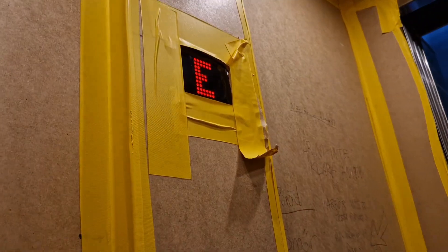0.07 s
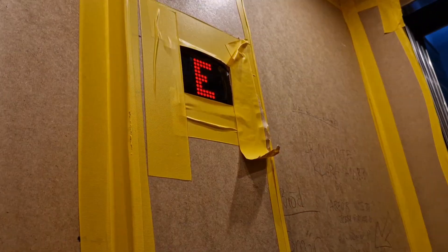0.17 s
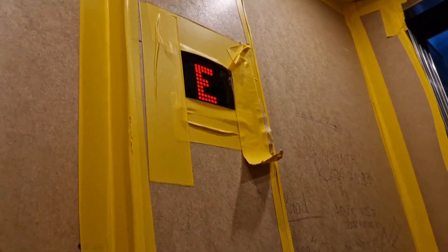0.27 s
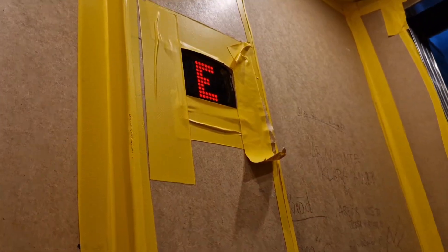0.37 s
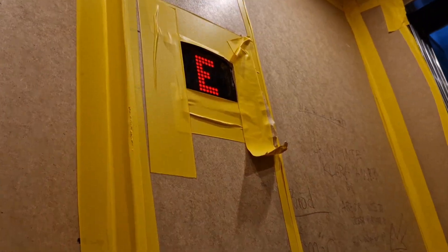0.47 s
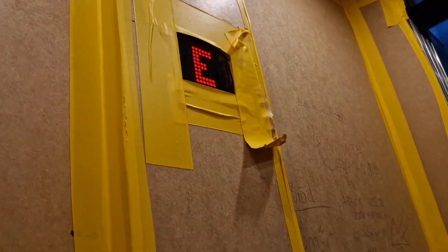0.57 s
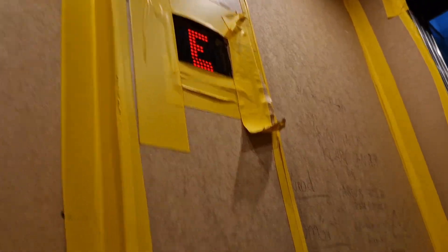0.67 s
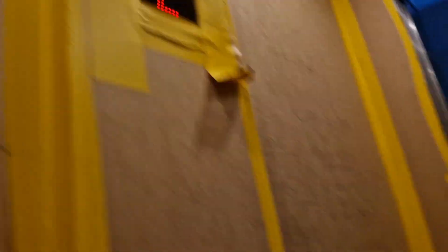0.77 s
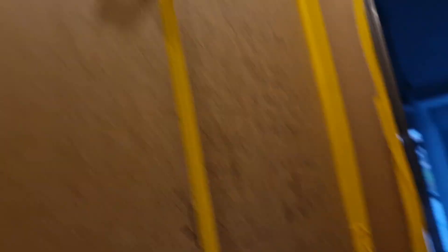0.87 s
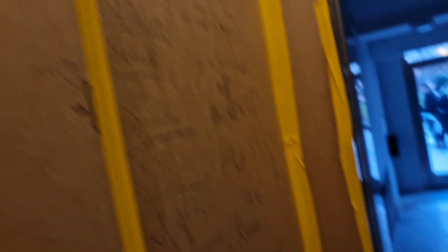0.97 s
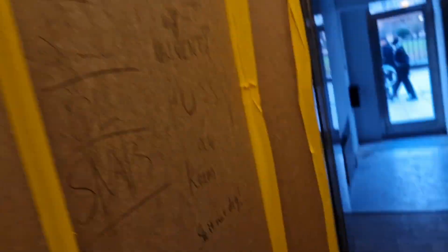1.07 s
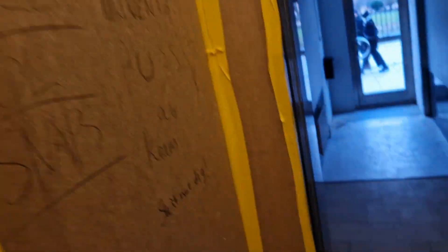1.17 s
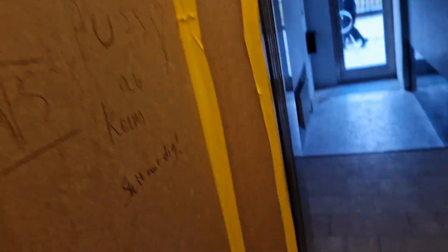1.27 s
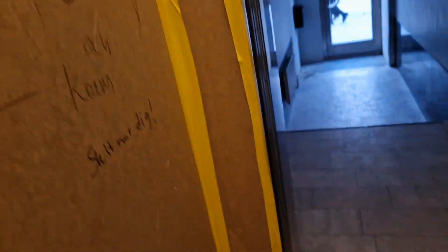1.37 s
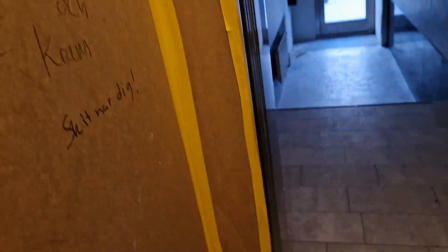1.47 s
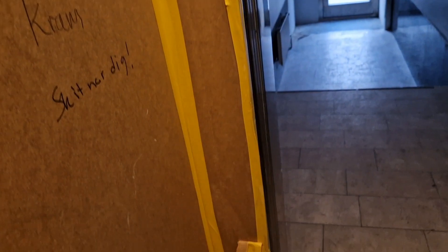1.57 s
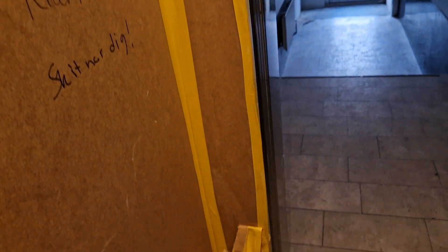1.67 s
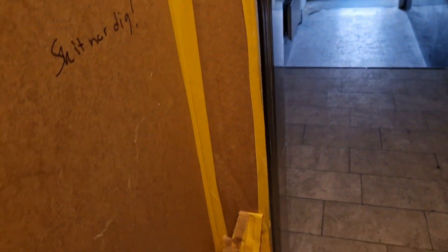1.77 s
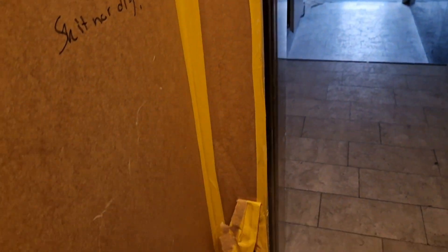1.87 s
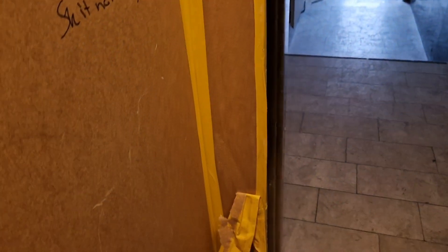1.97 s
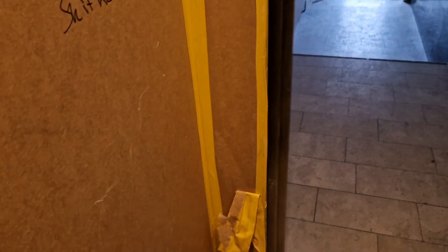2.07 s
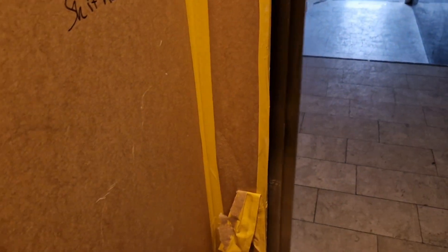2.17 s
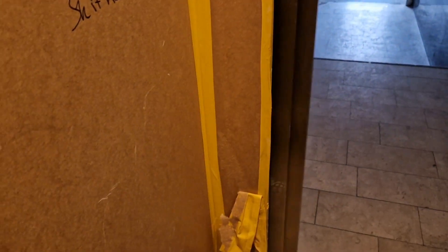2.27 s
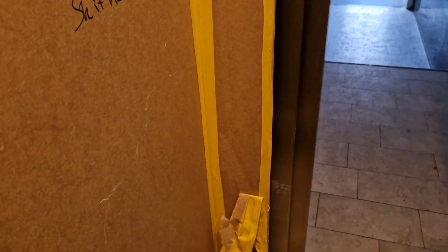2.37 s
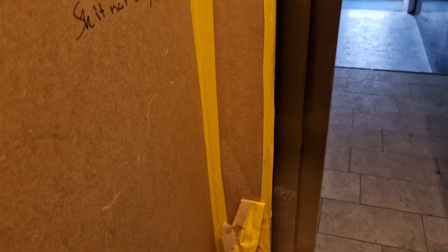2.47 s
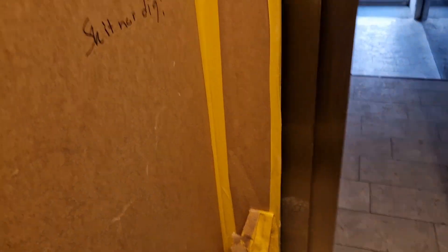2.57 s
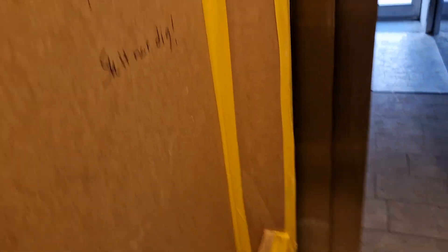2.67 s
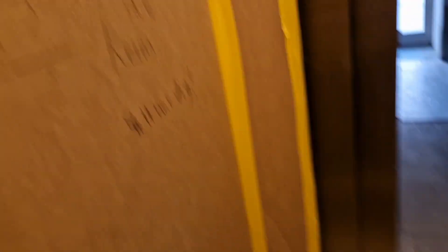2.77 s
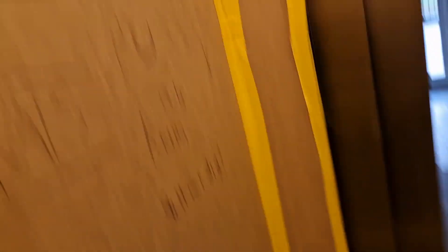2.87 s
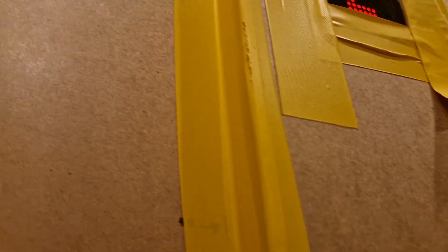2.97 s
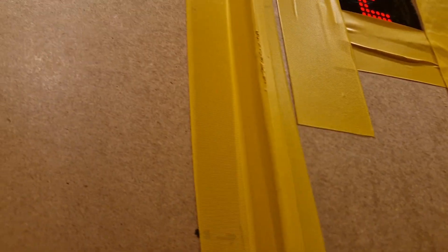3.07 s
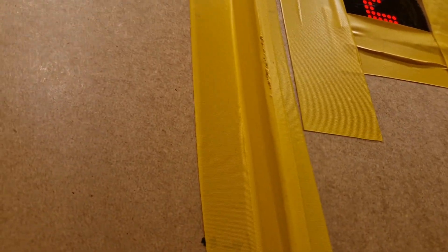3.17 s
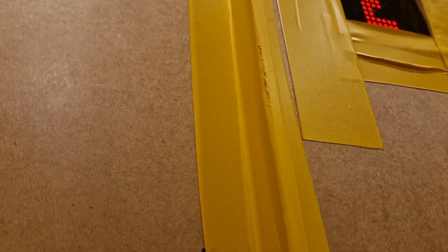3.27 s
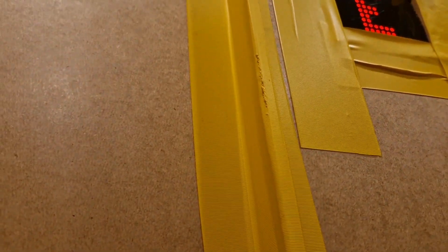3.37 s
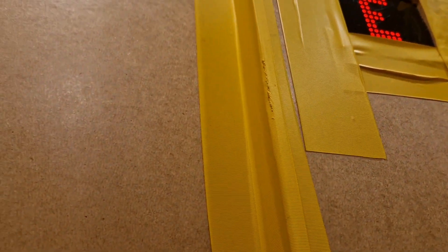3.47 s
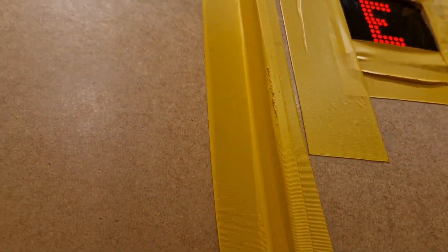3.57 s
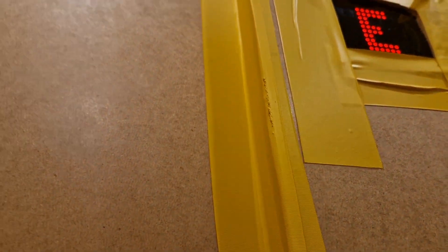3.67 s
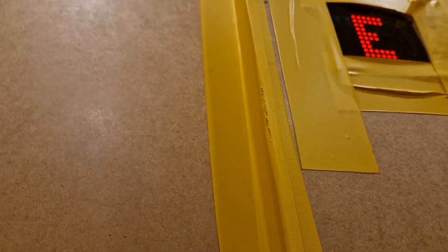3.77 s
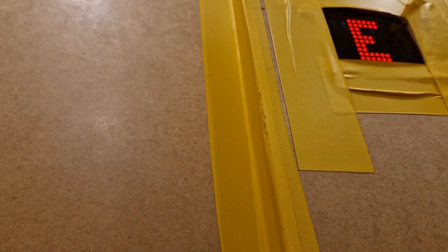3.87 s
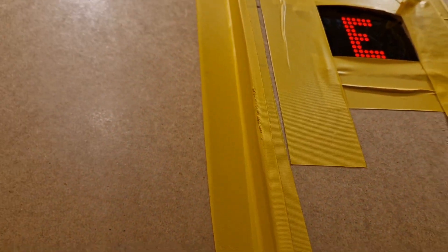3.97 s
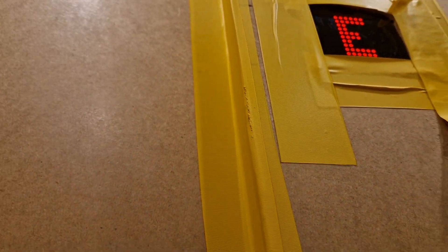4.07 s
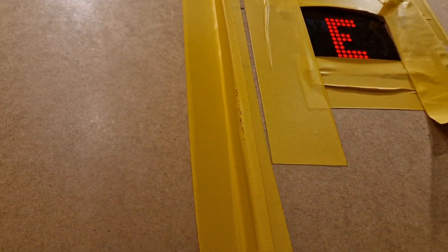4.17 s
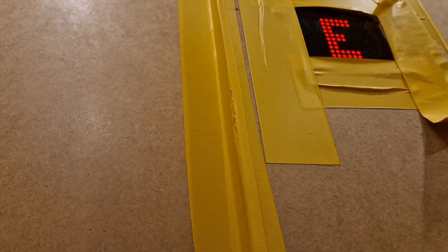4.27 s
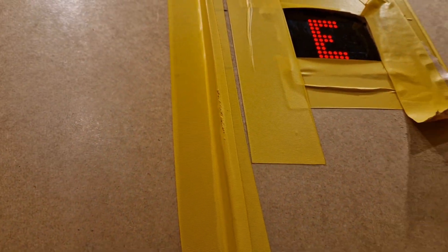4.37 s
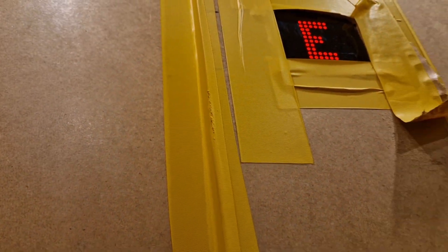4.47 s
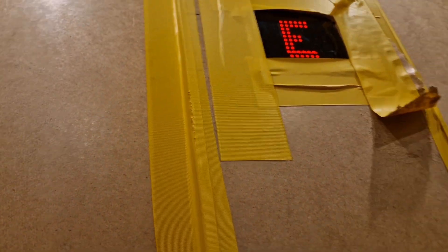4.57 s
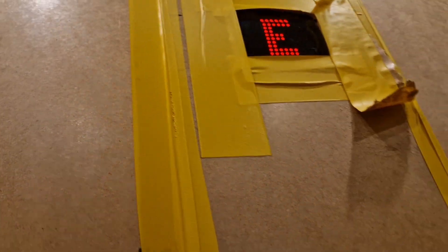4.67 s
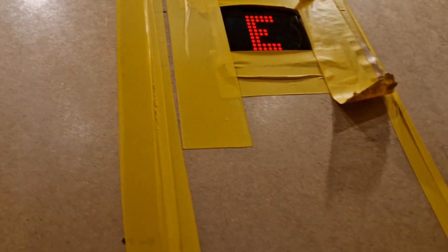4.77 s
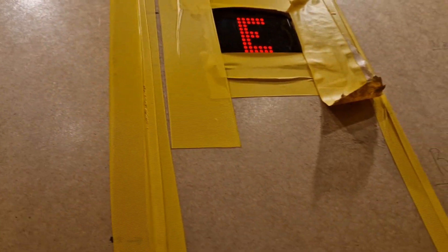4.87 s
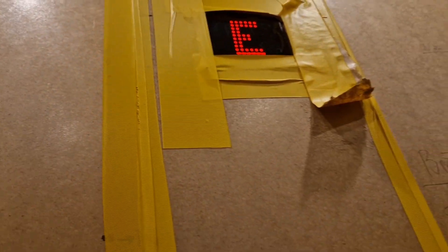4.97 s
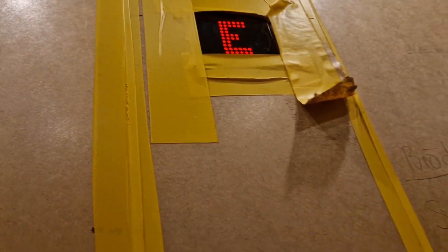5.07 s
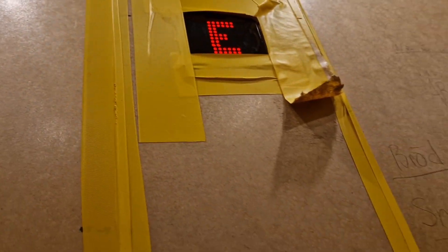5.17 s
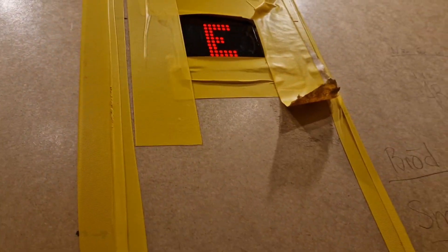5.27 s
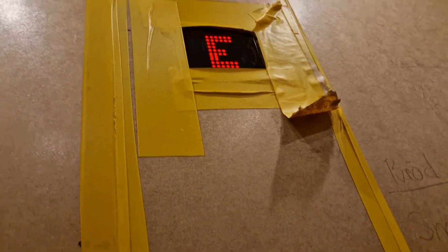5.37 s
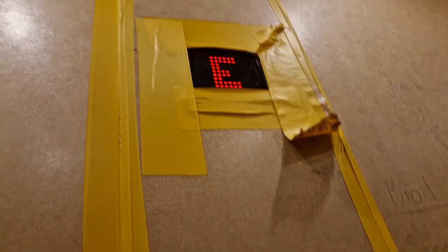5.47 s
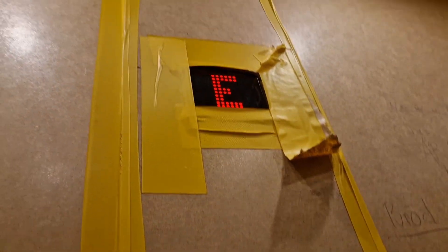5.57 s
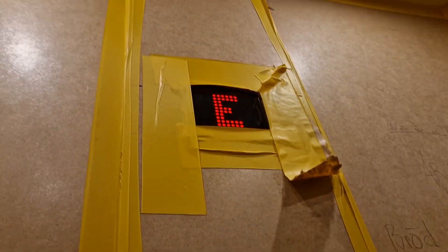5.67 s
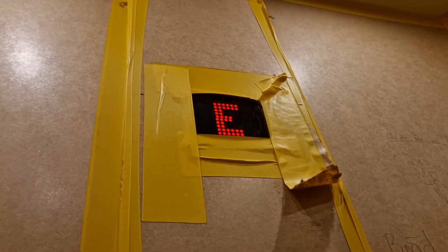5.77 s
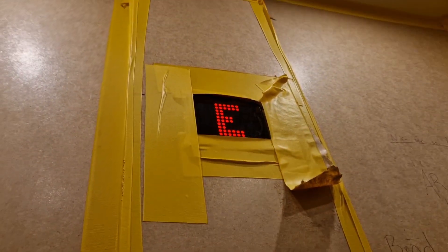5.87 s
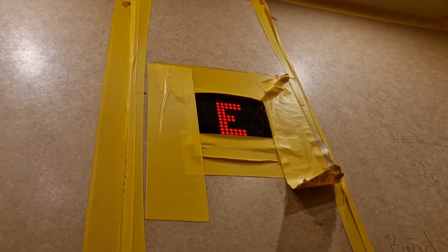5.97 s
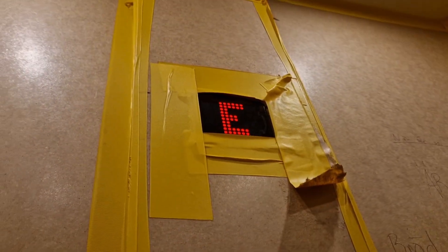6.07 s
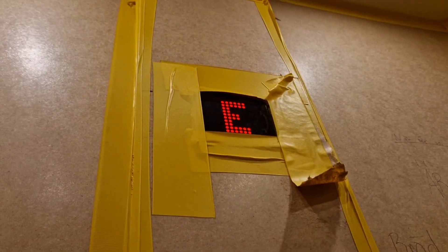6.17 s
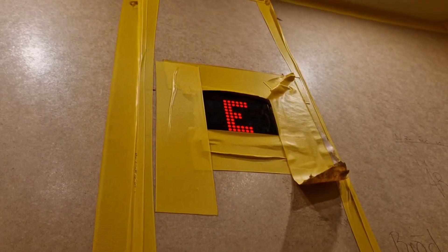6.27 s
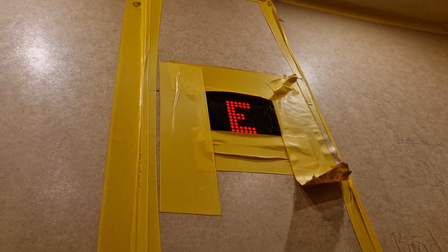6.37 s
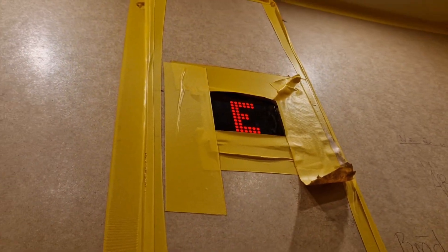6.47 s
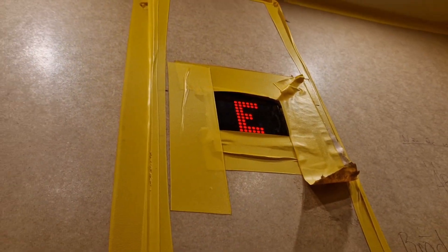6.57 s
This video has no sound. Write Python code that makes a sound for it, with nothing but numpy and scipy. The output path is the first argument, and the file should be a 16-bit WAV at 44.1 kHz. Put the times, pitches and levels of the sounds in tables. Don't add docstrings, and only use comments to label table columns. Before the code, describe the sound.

Lift doors roll shut with a deep boom and crisp uneven ticks, knock and scrape into place, then settle quietly amid close cloth rustle.

```python
import sys
import numpy as np
from scipy import signal
from scipy.fft import rfft, irfft, next_fast_len
from scipy.io import wavfile
from scipy.ndimage import uniform_filter1d

SR = 44100
rng = np.random.default_rng(int(sys.argv[2]) if len(sys.argv) > 2 else 0)


def boost_factor(decibels):
    exponent = np.asarray(decibels, float) / 20
    return 10 ** exponent


def log_audio(samples):
    frames = np.atleast_2d(samples).T
    limited = np.clip(frames, -1, 1)
    pcm = np.round(limited * 32767).astype(np.int16)
    wavfile.write(sys.argv[1], SR, pcm)


N = 292373
T = np.arange(N) / SR

# centre in Hz, width in Hz, level in dB.
CAR_PEAKS = [(30.2, 9.6, -1), (41.65, 11, 2.5), (52.3, 8.6, -2.5)]
LEAF_PEAKS = [(82.3, 15, 1), (110, 14.5, -4)]
SHEET_PEAKS = [(160.7, 50, 4), (242.4, 67, -4.5)]
FRAME_PEAKS = [(298.7, 48, 2), (366, 86, -2), (479, 120, -3), (567, 290, -6.5)]
# time in seconds, load on the car in dB, looseness of the leaves in dB.
DRIVE = [(0, -45.5, 1.5), (.47, -46, -4.5), (.83, -47, 3), (1.2, -44, 5), (1.68, -50.5, 2.5),
         (1.8, -31, -2.5), (2.3, -34, 4), (2.55, -33, 2.5), (3.1, -30, -2), (3.36, -29.5, -9),
         (3.52, -48, -1), (3.6, -33.5, -7.5), (4.05, -37, 3.5), (4.3, -29, 6), (4.67, -28, -1.5),
         (4.74, -36.5, -1), (5.45, -42.5, -1.5), (6.63, -55, -1)]
# level at idle in dB, share of load, share of looseness.
LEAF_FOLLOW = (-55, .9, 0.71)
SHEET_FOLLOW = (-61, .7, 1.)
FRAME_FOLLOW = (-60, 0.38, 1)
# start in seconds, hold in seconds, car in dB, leaf above car in dB, sheet above car in dB.
JOLTS = [(0.1, 0.026, -47, 2.5, -10), (0.29, .03, -36, -20, -19), (0.577, 0.033, -43.5, 1, -10.5),
         (0.844, .06, -46, -10, -5.5), (1.146, 0.023, -32.5, -5.5, -12), (1.305, 0.016, -39.5, -6, -17),
         (1.474, 0.14, -39.5, -14.5, -15.5), (1.804, 0.032, -32, -18, -12), (2.61, 0.045, -34, 0.5, -12.5),
         (2.72, .01, -27, -15, -37), (2.828, .01, -25, -23, -38), (2.946, .03, -38.5, 2.5, -11),
         (3.09, .03, -30, -4, -18.5), (3.343, 0.0091, -30.5, -13, -39), (3.463, 0.0077, -32, -10, -17.5),
         (3.79, .04, -35, -18, -41), (3.904, 0.011, -42, -2, -4), (3.976, .01, -28.5, -5.5, -22),
         (4.188, .01, -42, 7.5, 0), (4.262, 0.017, -32.5, 0, -18), (4.2, .36, -48, 0, 2),
         (4.536, .02, -34.5, 6.5, -17), (5.04, .02, -34.5, -4.5, -3.5), (5.904, 0.054, -59.5, 27, 1),
         (6.398, 0.015, -41, -3.5, -15.5)]
# centre in seconds, half width in seconds, depth in dB.
LULLS = [(.1, 0.047, 10), (.83, .08, 8.5), (1.24, 0.064, 12), (1.42, .05, 7), (2.07, 0.036, 8),
         (2.77, .04, 4), (2.92, 0.061, 9), (3.4, 0.045, 6), (4.05, 0.042, 5), (4.17, 0.046, 6),
         (4.37, .04, 4), (5.9, 0.2, 14)]

# start in seconds, peak in dB, brightness in dB, left minus right in dB.
TICKS = [(1.486, -37, -6, 4), (1.5812, -29.5, -4.5, 0.5), (1.736, -31, -2, -1), (1.8107, -32, -1, -3),
         (1.867, -43, 2, -3), (1.9577, -32.5, 2, -3.5), (2.043, -33.5, -2, -2), (2.157, -33.5, 2.5, 1),
         (2.2461, -32.5, -3.5, -3), (2.3632, -31, -0.5, 2), (2.447, -33, -4.5, -1), (2.6245, -33, 3, 2)]
# centre in Hz, width in Hz, level in dB.
TICK_BODY = [(1740, 500, -3), (2350, 600, 0), (3110, 900, 5), (5200, 4500, -7.5)]
TICK_EDGE = [(7640, 3100, -2.5), (9440, 1400, 0), (11600, 2300, -2.5), (14500, 2300, 2), (16700, 470, 10.5)]
# frequency in Hz, level in dB, T60 in seconds.
TICK_MODES = [(1747, -2, .14), (2210, -4.5, .07), (2902, -1, .07), (3280, -2, .09), (9600, -3, .015)]
# start in seconds, peak in dB, frequency in Hz, T60 in seconds.
PANEL_MODES = [(1.005, -37, 172, .9), (1.08, -36, 62, .3), (1.15, -24.5, 52, .25), (4.15, -35, 135, .3),
               (4.2, -39, 373, .2), (4.51, -32, 92, .2), (4.53, -37.5, 376.5, 0.29), (4.555, -35, 288, .3),
               (4.6, -30, 45.5, .5), (4.515, -37, 470, .2), (4.42, -36, 140, .2), (4.42, -41, 360, 0.14),
               (2.2, -41, 155, .3), (2.5, -38, 117, .5), (4.27, -40, 345, .3), (4.37, -40, 300, .3),
               (4.148, -36, 400, .1), (2.1, -42, 130, .3), (2.3, -43, 160, .3), (2.7, -41, 115, .4),
               (3.05, -42, 165, .3), (5.003, -38, 850, .08), (5.03, -40, 290, .2), (3.56, -42, 114, .3),
               (2.635, -38, 720, .1), (6.2, -44, 70, 0.44)]

# start in seconds, peak in dB, centre in Hz, left minus right in dB, width in octaves.
KNOCKS = [(1.091, -29.5, 596, -1, 1), (1.808, -37, 291, 0, 0.76), (1.993, -39, 600, 0, 0.89),
          (2.445, -35.5, 308, -1, 1), (2.633, -31, 690, -2, 0.47), (3.004, -35.5, 482, -2, 0.89),
          (3.868, -37.5, 290, -6, .76), (4.146, -27, 334, -1, 0.91), (4.204, -30, 340, -3, 0.49),
          (4.274, -34.5, 350, -7, 0.41), (4.376, -33, 332, -2, 0.4), (4.507, -27.5, 315, -4, 0.91),
          (4.524, -29, 437, 3, 1), (4.568, -36.5, 304, -6, 0.37), (5.02, -41, 230, -4, 0.77)]
SCUFFS = [(1.2683, -34.5, 3200, -4.5, 1.6), (1.8671, -33.5, 1540, -4, 1.4), (2.6323, -27.5, 1760, -1, 1.9),
          (3.8818, -27.5, 2700, -4, 0.71), (4.0294, -29.5, 2600, -3.5, 0.81),
          (4.1474, -35.5, 1490, -1, 1.1), (4.416, -35, 4230, -7.5, 0.87), (4.459, -37.5, 2260, -3, 0.83),
          (4.5222, -28.5, 1980, -6.5, 1.4)]
SLAM = [
    (1.078, -26, 4500, -3, 3.2),
    (1.085, -22, 4500, -3, 3),
    (1.095, -22, 3200, -3, 3),
    (1.083, -29, 7450, -4, .08),
]
RATTLE = [
    (1.108, -31, 3720, -4.5, 1.9),
]
LATCH = [
    (4.422, -35, 990, -1, 0.48),
    (2.382, -40.5, 710, -2, 0.5),
    (5.002, -33, 820, -2.5, 0.3),
]
THUDS = [
    (1.006, -37.5, 220, 2, 0.34),
    (1.145, -29, 90.4, -1, 0.6),
    (4.152, -26, 157, -4, 0.11),
    (4.513, -22, 79, -2, 0.46),
    (5.03, -25, 125, 0, 0.36),
    (5.876, -26, 116, -2, 0.15),
    (5.9, -36, 189, 0, 0.46),
    (6.25, -42, 3900, -5.5, 1.4),
]
EXTRA_KNOCKS = [(3.9, -35, 263, -3, 0.2), (4.045, -38.5, 277, -5, .3), (4.315, -39, 350, -3, 0.82),
                (4.42, -35, 324, -3, 0.46), (4.46, -38, 320, -3, .7), (4.545, -33, 370, -6, 0.34),
                (4.59, -38, 293, -4, 0.27)]
SETTLES = [(5.79, -39, 120.4, -1, 0.32), (5.98, -38, 170, -1, 0.26), (6.085, -32, 110, -1, 0.15),
           (6.27, -34.5, 107, -1, .25), (2.0, -32.5, 150, -1, 0.33), (2.43, -32, 125, -1, 0.25)]
CLACKS = [(5.264, -44, 660, -5, .9), (5.31, -45, 560, -5, .9), (2.374, -35, 2950, -2, 0.43),
          (2.918, -40, 780, -2, 1.8), (2.636, -36, 1100, -2, 2.5), (3.887, -41, 1500, -4, 2.5),
          (4.032, -41, 1800, -3, 2.5), (5.743, -50, 14000, 6, .6)]
TAPS = [
    (.211, -50, 600, 1, 2.5),
    (.279, -44, 700, 14, 6.2),
    (.34, -43, 900, 16, 3),
    (.614, -25, 2430, 14, 3.5),
    (.654, -36, 2600, 14, 4),
    (5.743, -41, 900, 21, 2.),
]
# start in seconds, length in seconds, start in Hz, end in Hz, level in dB.
SQUEAKS = [(4.3, .1, 15500, 15400, -43), (4.412, .018, 4440, 4400, -45), (4.52, .03, 5300, 5220, -43),
           (1.12, .14, 7450, 7400, -53), (5.16, .17, 8750, 9250, -62), (5.27, .15, 9150, 10250, -66),
           (5.37, .17, 10150, 10800, -62), (5.31, .1, 11400, 11750, -60)]

# centre in Hz, width in Hz, level in dB.
WEAVE_PEAKS = [(4440, 2700, 2), (5550, 2200, 0), (7050, 1300, 0)]
FOLD_PEAKS = [(900, 1060, 3), (1400, 440, 0), (1670, 1600, 2.5), (2110, 310, 2), (2760, 1450, 1.5),
              (3250, 410, 1)]
SHEEN_PEAKS = [(9600, 2300, 0)]
HISS_PEAKS = [(12080, 2500, 0.3), (13900, 3700, -4.5), (14900, 840, -2.5)]
# start in seconds, hold in seconds, weave in dB, folds above weave in dB,
# fine hiss above weave in dB.
STROKES = [(0, 0.067, -53, 4, -16), (0.217, 0.21, -62, 4.5, -4), (0.65, 0.018, -52.5, 1.5, 1),
           (0.784, .17, -48, 2.5, 2.5), (1.212, 0.082, -46.5, 2, -3), (1.387, 0.15, -51.5, 4, 0),
           (1.6, 0.85, -60, 5.5, -3), (1.793, .01, -57.5, 2, 1), (2.04, 0.0091, -62, 8, .5),
           (2.39, .05, -55, 5, -3), (2.522, 0.51, -53.5, -4.5, -12), (2.63, 0.33, -53, 1, -2.5),
           (2.932, 0.093, -57, -2, -3), (3.084, 1, -61.5, -1.5, 2.5), (3.452, .03, -59, -6, 4),
           (3.878, 0.19, -56, 2.5, 3.5), (4.122, 0.22, -47, 0, 2), (4.43, 0.12, -51.5, 3, 2.5),
           (4.62, 0.29, -56.5, -3, 1.5), (5.005, 0.11, -48.5, .5, -0.5), (5.202, 0.27, -53.5, 1.5, -9),
           (5.492, 0.11, -45, -2, -6), (6.168, 0.099, -62, -1, -3), (6.3, 0.23, -74, 12.5, -9)]
# weave, folds, sheen, hiss, all in dB.
REST_DB = (-67.5, -66, -74, -73)
# weave, folds, sheen, hiss, all left minus right in dB.
SHADOW_DB = (-5.5, -1, 9, -1.5)
# time in seconds, left minus right in dB.
TURN = [(0, -7.5), (.15, -5), (.22, -13), (.56, -14.5), (.63, 12.5), (.71, -5.5), (1., -3.5), (1.2, -2.5),
        (2.3, -1.5), (2.56, -2.5), (3.3, -6.5), (5.4, -5.5), (5.5, 5.5), (5.62, 6), (5.7, -5.5), (6.63, -4)]

# start in seconds, hold in seconds, level in dB.
SEAL = [(2.45, .46, -56), (2.53, 0.088, -57)]
GUIDE = [(5.04, .1, -57), (5.15, .28, -59)]
# centre in Hz, width in Hz, level in dB.
SEAL_PEAKS = [(4900, 900, 0), (6000, 900, -1), (7200, 900, -2), (8600, 700, -1)]
GUIDE_PEAKS = [(2130, 140, -1), (3230, 310, 1), (5040, 200, -3), (7200, 300, -1)]

# centre in Hz, width in Hz, level in dB.
VENT_PEAKS = [(1010, 220, 0.27), (1340, 380, 1.2)]
# time in seconds, level over the usual in dB.
DRAUGHT = [(0, 0), (.3, -9), (.6, 0), (3., 3.5), (3.8, 8), (5.6, -2), (5.8, -7), (6.03, -12), (6.1, 10),
           (6.63, 9.5)]
# frequency in Hz, left-right correlation.
SAME = [(40, .995), (130, .97), (290, .85), (640, .6), (1400, .05), (16000, .01)]

IDLE_DB, VENT_DB = -44, -70
JOLT_RISE_DB_S, JOLT_FALL_DB_S, JOLT_SAG_DB, JOLT_FRAME_DB = 180, 134, 2.5, -9
STROKE_RISE_DB_S, STROKE_FALL_DB_S, STROKE_SAG_DB = 129, 119, 2.5
SHEEN_DB, SHEEN_FINE_SHARE = -9, .4
TICK_MODE_DB, TICK_SCATTER_DB = -11.5, 2.5
KNOCK_T60_S, LATCH_T60_S, THUD_T60_S, TAP_T60_S = .15, 0.088, 0.27, 0.0056
SCUFF_T60_S, SLAM_T60_S, RATTLE_T60_S, CLACK_T60_S = 0.066, 0.096, 0.62, .022
WAVER_SHARE_AT_10K = .004
CAR_T60_S, CAR_WET_DB = 0.11, -7.5
CHANGE_S, CHANGE_WIDTH_S = 2.925, .005
TOP_HZ = 15700


def unit(x):
    return x / np.sqrt(np.mean(x ** 2))


def curves(table):
    s, *columns = np.transpose(table)
    return [np.interp(T, s, c) for c in columns]


def sides(pan_db):
    return boost_factor(np.clip(np.array([pan_db, -pan_db]), -24, 24) / 2)


def walk(rate_hz):
    k = int(SR / rate_hz)
    steps = np.repeat(rng.standard_normal(N // k + 1), k)
    return 0.93 * uniform_filter1d(uniform_filter1d(steps, k), k)[:N]


def resonate(force, peaks):
    size = force.shape[1]
    hz = np.maximum(np.arange(size // 2 + 1) * SR / size, 1)
    power = sum((boost_factor(db) / (1 + ((hz / f - f / hz) * f / width) ** 2)) ** 2 for f, width, db in peaks)
    same_hz, likeness = np.transpose(SAME)
    same = np.interp(np.log(hz), np.log(same_hz), likeness)
    mid, side = rfft(force) * np.sqrt(power)
    mid = mid * np.sqrt(1 + same)
    side = side * np.sqrt(1 - same)
    return unit(irfft(np.array([mid + side, mid - side]), size))


def shaken(peaks, db, flicker_db, rate_hz, grit_db, hold_s):
    size = next_fast_len(N)
    grit = boost_factor(grit_db * rng.exponential(size=size))
    x = resonate(rng.standard_normal((2, size)) * grit, peaks)[:, :N]
    k = int(hold_s * SR)
    swell = uniform_filter1d(uniform_filter1d(np.mean(x ** 2, axis=0), k), k)
    return x / np.sqrt(swell + 0.062) * boost_factor(db + flicker_db * walk(rate_hz))


def swells(s, hold_s, rise_db_s, fall_db_s, sag_db):
    t = T[::64] - s[:, None]
    hold = np.maximum(hold_s, .001)[:, None]
    same_scene = (s[:, None] + hold / 2 < CHANGE_S) == (T[::64] < CHANGE_S)
    rise = rise_db_s * np.minimum(t, 0)
    sag = sag_db * np.clip(t / hold, 0, 1)
    fall = fall_db_s * np.maximum(t - hold, 0)
    return same_scene * boost_factor(2 * (rise - sag - fall))


def heap(base_db, event_db, shapes):
    events = np.repeat(boost_factor(2 * event_db) @ shapes, 64)[:N]
    return 10 * np.log10(boost_factor(2 * base_db) + events)


def add(out, s, x):
    i = int(s * SR)
    out[:, i:i + x.shape[1]] += x[:, :N - i]


def rolling():
    load_db, loose_db = curves(DRIVE)
    s, hold_s, car_up_db, leaf_up, sheet_up = np.transpose(JOLTS)
    shapes = swells(s, hold_s, JOLT_RISE_DB_S, JOLT_FALL_DB_S, JOLT_SAG_DB)

    def follow(idle_db, load, loose):
        return idle_db + load * (load_db - IDLE_DB) + loose * loose_db

    lull_db = sum(db * np.maximum(1 - np.abs(T - at) / half_s, 0) for at, half_s, db in LULLS)
    boom_db = heap(load_db, car_up_db, shapes) - lull_db
    leaf_db = heap(follow(*LEAF_FOLLOW), car_up_db + leaf_up, shapes)
    sheet_db = heap(follow(*SHEET_FOLLOW), car_up_db + sheet_up, shapes)
    frame_db = heap(follow(*FRAME_FOLLOW), car_up_db + sheet_up + JOLT_FRAME_DB, shapes)
    boom = shaken(CAR_PEAKS, boom_db, flicker_db=1.5, rate_hz=8, grit_db=1.25, hold_s=0.056)
    leaf = shaken(LEAF_PEAKS, leaf_db, flicker_db=0.3, rate_hz=10, grit_db=2.0, hold_s=0.07)
    sheet = shaken(SHEET_PEAKS, sheet_db, flicker_db=-0.5, rate_hz=22, grit_db=3, hold_s=0.044)
    frame = shaken(FRAME_PEAKS, frame_db, flicker_db=1.9, rate_hz=25, grit_db=2.5, hold_s=0.15)
    return boom + leaf + (sheet + frame) * sides(-2.7)[:, None]


def snap(peaks, t, t60_s):
    noise = rng.standard_normal((2, len(t)))
    return resonate(noise, peaks) * boost_factor(-60 * t / t60_s) * np.minimum(t / 0.00087, 1)


def ticks():
    out, t = np.zeros((2, N)), T[:4096]
    for s, db, bright_db, pan_db in TICKS:
        body = snap(TICK_BODY, t, t60_s=0.024)
        edge = snap(TICK_EDGE, t, t60_s=0.016)
        add(out, s, boost_factor(db - 1.5) * sides(pan_db)[:, None] * (body + boost_factor(bright_db + 8) * edge))
    return out


def modes(rows, rise_s, rough_db, rate_hz):
    out, t, stutter = np.zeros((2, N)), T[:16384], walk(rate_hz)
    chance = rng.standard_normal((len(rows), 3))
    for k, ((s, db, hz, t60_s), (tune, phase, lag)) in enumerate(zip(rows, chance)):
        rough = np.roll(stutter, -4001 * k)[:len(t)]
        port_lag = np.array([[0], [lag * min(hz / 1500, 1.5)]])
        turn = 2 * np.pi * hz * (1 + .01 * tune) * t + 3 * phase + rough + port_lag
        level = boost_factor(db - 60 * t / t60_s + rough_db * rough[::-1])
        add(out, s, level * np.minimum(t / rise_s, 1) * np.sin(turn))
    return out


def ringing():
    scatter_db = TICK_SCATTER_DB * rng.standard_normal((len(TICKS), len(TICK_MODES)))
    rows = []
    for (s, tick_db, _, _), row_db in zip(TICKS, scatter_db):
        for (hz, db, t60_s), d in zip(TICK_MODES, row_db):
            rows.append((s, tick_db + TICK_MODE_DB + db + d, hz, t60_s))
    steel = modes(rows, rise_s=.003, rough_db=5., rate_hz=400)
    return steel + modes(PANEL_MODES, rise_s=0.013, rough_db=2.5, rate_hz=40)


def blows(table, rise_s, t60_s, gain_db):
    out, t = np.zeros((2, N)), T[:16384]
    fade = np.minimum(t / rise_s, 1) * boost_factor(-60 * t / t60_s)
    for s, db, hz, pan_db, octaves in table:
        body = resonate(rng.standard_normal((2, len(t))), [(hz, hz * octaves, 0)])
        add(out, s, boost_factor(db + gain_db) * sides(pan_db)[:, None] * body * fade)
    return out


def strikes():
    scuffs = blows(SCUFFS, 0.0018, SCUFF_T60_S, gain_db=-2.0)
    slam = blows(SLAM, 0.00084, SLAM_T60_S, gain_db=-0.5)
    return scuffs + slam + blows(RATTLE, 0.0014, RATTLE_T60_S, gain_db=-3.0)


def knocks():
    rattles = blows(KNOCKS, 0.0068, KNOCK_T60_S, gain_db=-1.5)
    latch = blows(LATCH, 0.0035, LATCH_T60_S, gain_db=-1.5)
    return rattles + latch + blows(THUDS, 0.0098, THUD_T60_S, gain_db=-4.0)


def settling():
    extra_knocks = blows(EXTRA_KNOCKS, 0.0084, KNOCK_T60_S, gain_db=-1.0)
    settles = blows(SETTLES, 0.018, THUD_T60_S, gain_db=-5.0)
    return extra_knocks + settles + blows(CLACKS, .001, CLACK_T60_S, gain_db=-1.5)


def squeaks():
    out, waver = np.zeros((2, N)), walk(500)
    for s, length_s, start_hz, end_hz, db in SQUEAKS:
        t = T[:int(length_s * SR)]
        rough = waver[int(s * SR):][:len(t)]
        glide_hz = start_hz + (end_hz - start_hz) * t / length_s
        hz = glide_hz * (1 + WAVER_SHARE_AT_10K * (start_hz / 1e4) ** 3 * rough)
        tone = np.sin(2 * np.pi * np.cumsum(hz) / SR + np.array([[0], [1.6]]))
        add(out, s, boost_factor(db + 3.9 * rough[::-1]) * np.sin(np.pi * t / length_s) * tone)
    return out * sides(-13.5)[:, None]


def drag(table, peaks):
    s, hold_s, db = np.transpose(table)
    level_db = heap(-90, db, swells(s, hold_s, STROKE_RISE_DB_S, STROKE_FALL_DB_S, 1.4))
    hiss = shaken(peaks, level_db, flicker_db=1.5, rate_hz=30, grit_db=1.5, hold_s=.1)
    return hiss * sides(-7.0)[:, None]


def taps():
    return blows(TAPS, 0.00047, TAP_T60_S, gain_db=-0.5)


def cloth():
    s, hold_s, weave_db, fold_up, fine_up = np.transpose(STROKES)
    shapes = swells(s, hold_s, STROKE_RISE_DB_S, STROKE_FALL_DB_S, STROKE_SAG_DB)
    sheen_up = SHEEN_DB + SHEEN_FINE_SHARE * fine_up
    strokes_db = weave_db + np.array([0 * s, fold_up, sheen_up, fine_up])
    pan_db, = curves(TURN)
    rustle = np.zeros((2, N))
    layers = (WEAVE_PEAKS, FOLD_PEAKS, SHEEN_PEAKS, HISS_PEAKS)
    for peaks, rest_db, db, shade_db in zip(layers, REST_DB, strokes_db, SHADOW_DB):
        level_db = heap(rest_db, db, shapes)
        layer = shaken(peaks, level_db, flicker_db=1.44, rate_hz=35, grit_db=1.5, hold_s=0.092)
        rustle += layer * sides(pan_db + shade_db)
    return rustle * boost_factor(1.4 * walk(30))


def vent():
    level_db = VENT_DB + curves(DRAUGHT)[0]
    return shaken(VENT_PEAKS, level_db, flicker_db=1.5, rate_hz=5.7, grit_db=0.0, hold_s=0.099)


def car(x):
    t = T[:16384]
    noise = resonate(rng.standard_normal((2, len(t))), [(1500, 15000, 0)])
    tail = noise * boost_factor(-60 * t / CAR_T60_S) * (t > .004)
    tail = tail / np.sqrt(np.sum(tail ** 2, axis=1, keepdims=True))
    return x + boost_factor(CAR_WET_DB) * signal.fftconvolve(x, tail, axes=1)[:, :N]


def scene():
    hard = car(ticks() + strikes() + squeaks())
    doors = rolling() + hard + ringing() + knocks() + settling()
    rubbing = drag(SEAL, SEAL_PEAKS) + drag(GUIDE, GUIDE_PEAKS)
    return doors + rubbing + taps() + cloth() + vent()


def low_pass(x):
    return signal.sosfilt(signal.butter(12, 16980, fs=SR, output="sos"), x)


def record(dry):
    soft = np.tanh(3 * dry) / 3
    dip = np.clip(np.abs(T - CHANGE_S) / CHANGE_WIDTH_S, .02, 1)
    shelf = signal.ellip(7, .3, 33, TOP_HZ, fs=SR, output="sos")
    mix = signal.sosfilt(shelf, soft * dip)
    return low_pass(mix)


dry = scene()
out = record(dry)
log_audio(out)
```